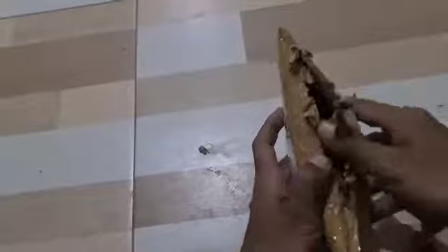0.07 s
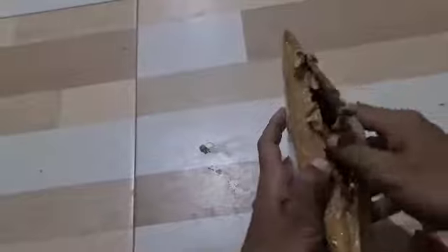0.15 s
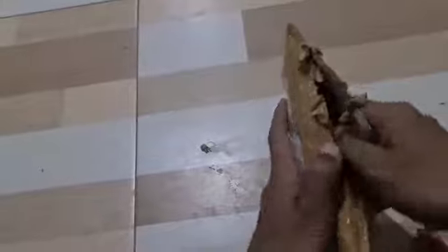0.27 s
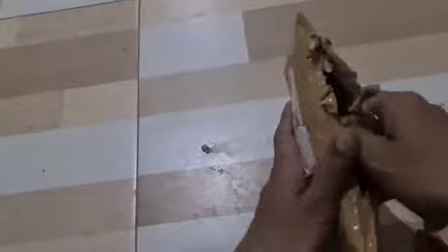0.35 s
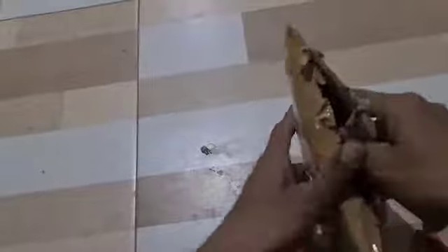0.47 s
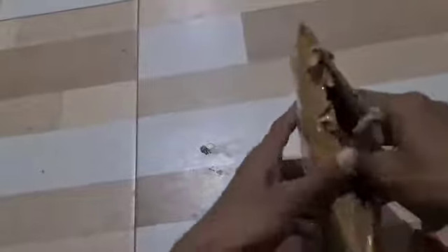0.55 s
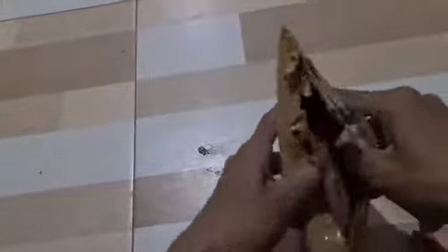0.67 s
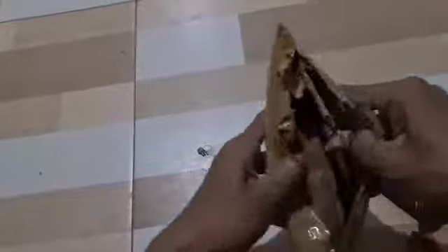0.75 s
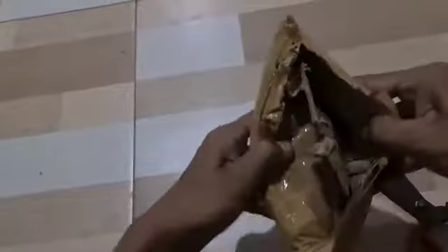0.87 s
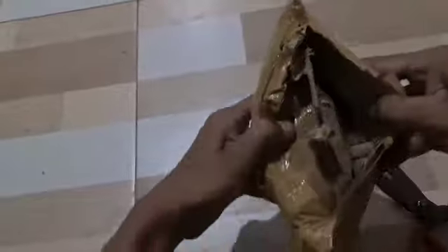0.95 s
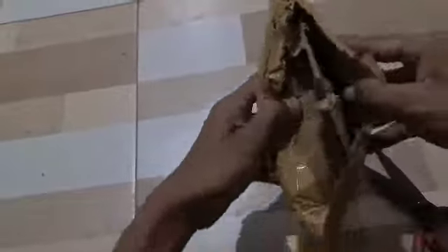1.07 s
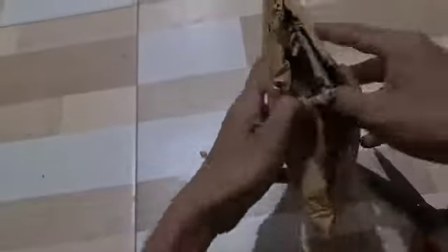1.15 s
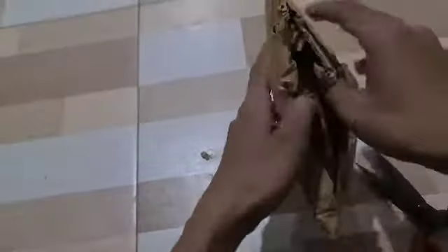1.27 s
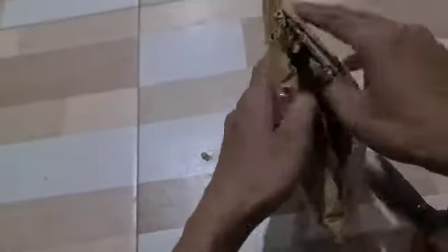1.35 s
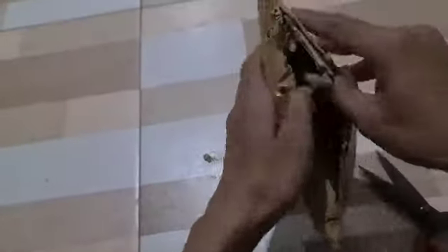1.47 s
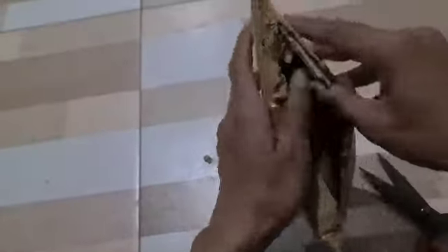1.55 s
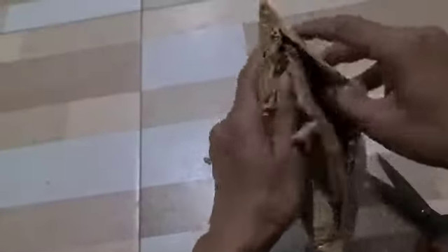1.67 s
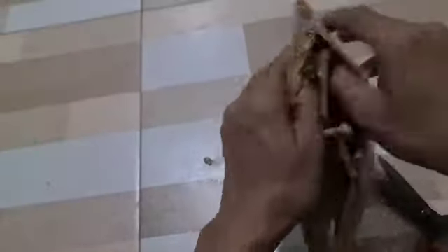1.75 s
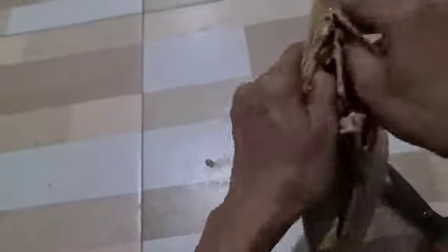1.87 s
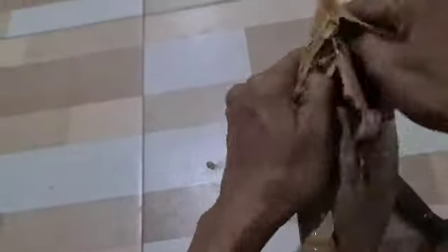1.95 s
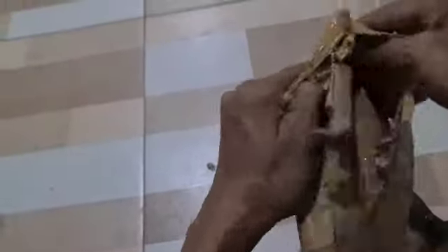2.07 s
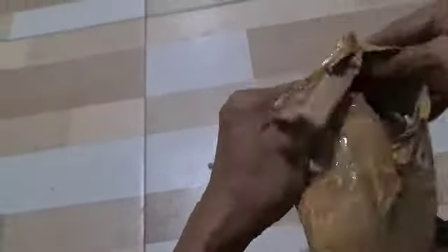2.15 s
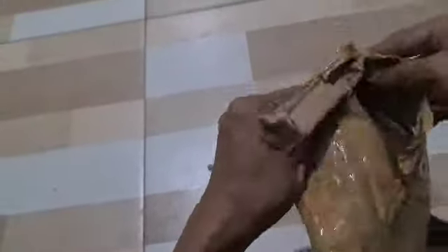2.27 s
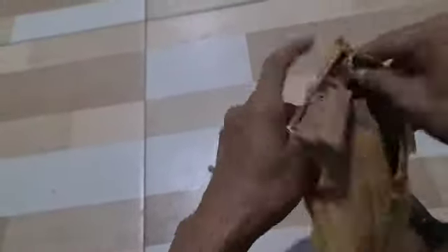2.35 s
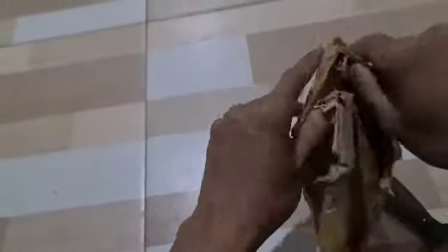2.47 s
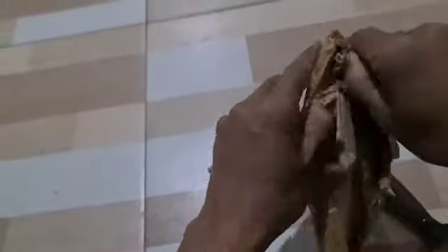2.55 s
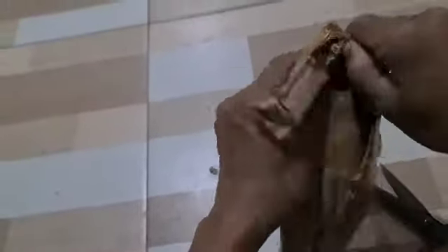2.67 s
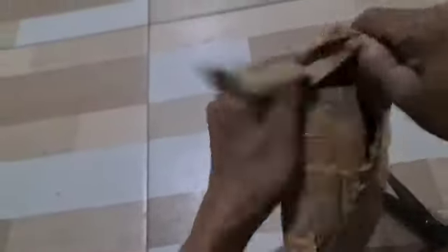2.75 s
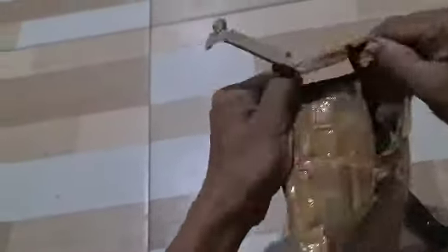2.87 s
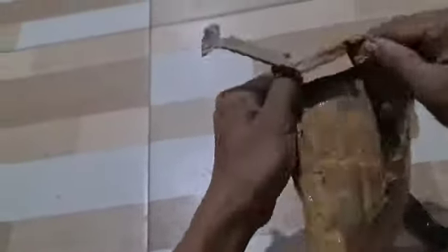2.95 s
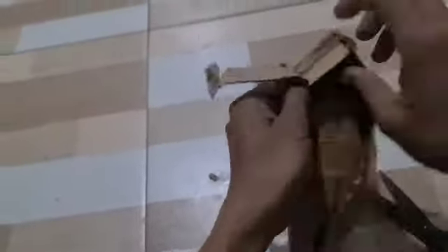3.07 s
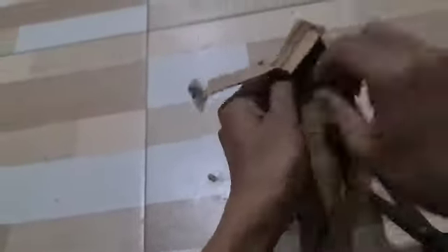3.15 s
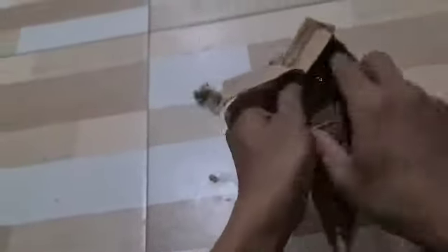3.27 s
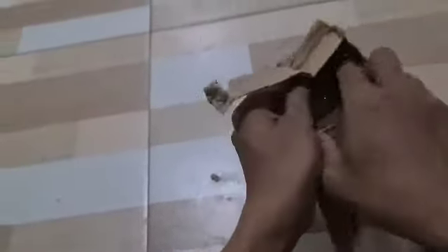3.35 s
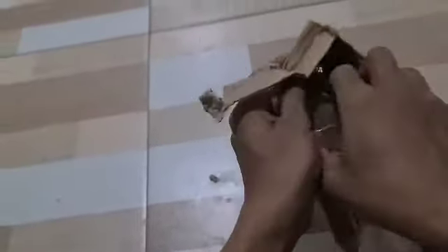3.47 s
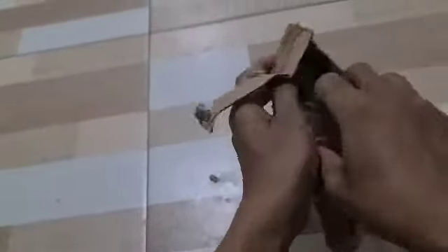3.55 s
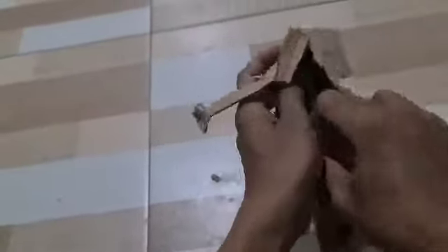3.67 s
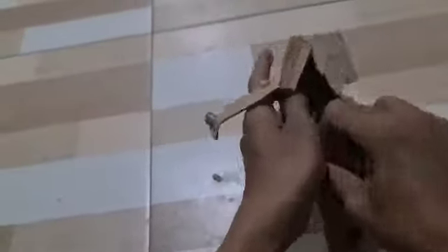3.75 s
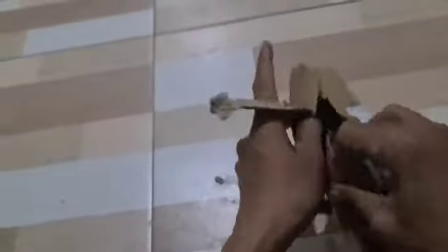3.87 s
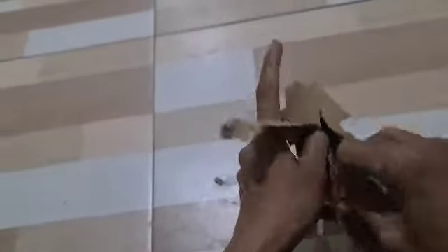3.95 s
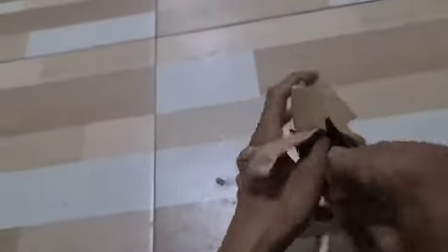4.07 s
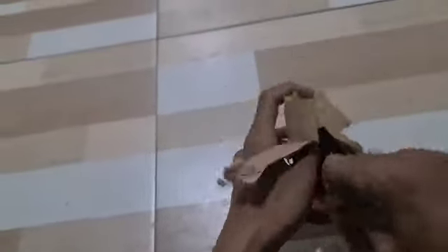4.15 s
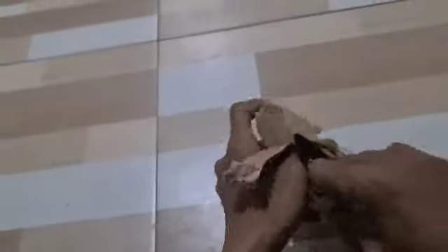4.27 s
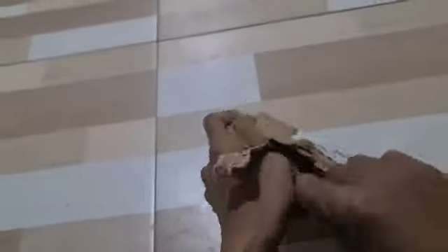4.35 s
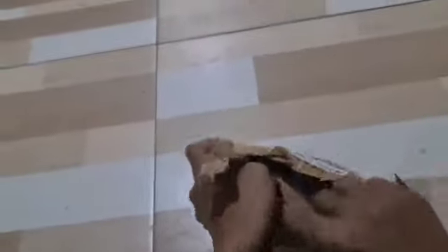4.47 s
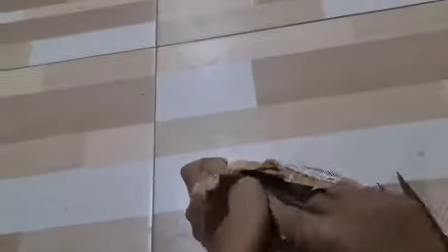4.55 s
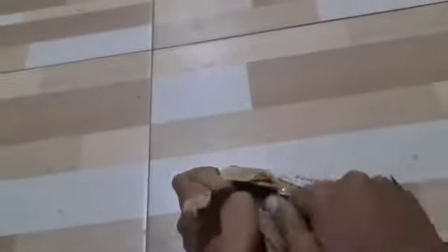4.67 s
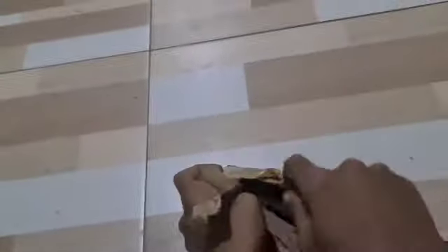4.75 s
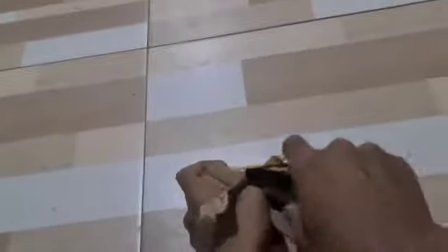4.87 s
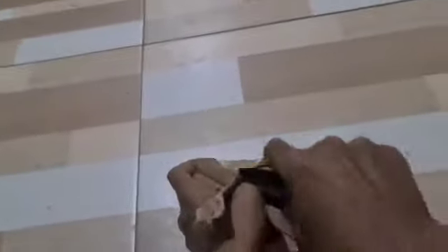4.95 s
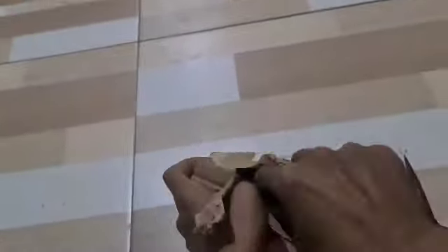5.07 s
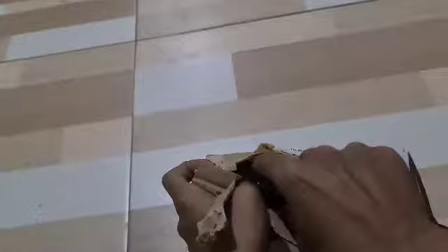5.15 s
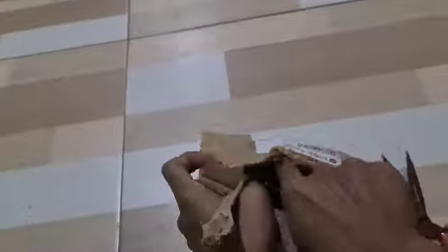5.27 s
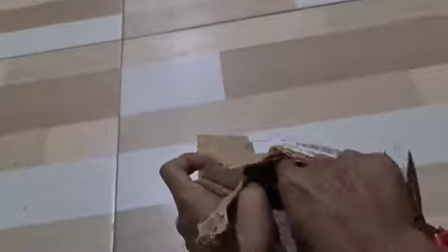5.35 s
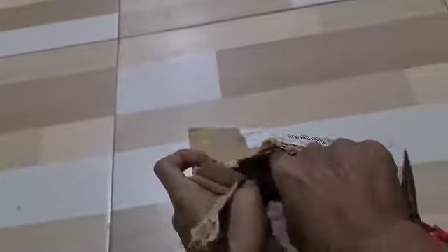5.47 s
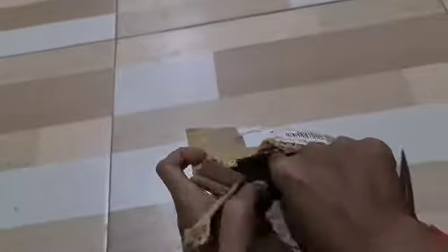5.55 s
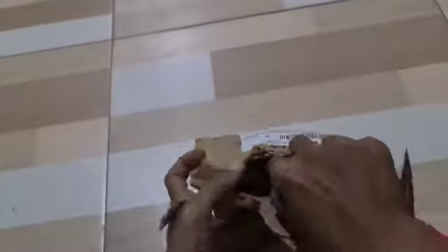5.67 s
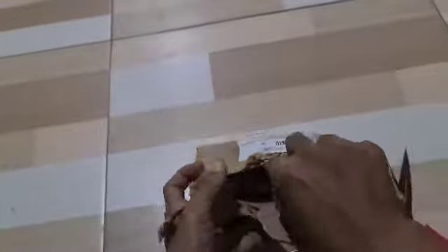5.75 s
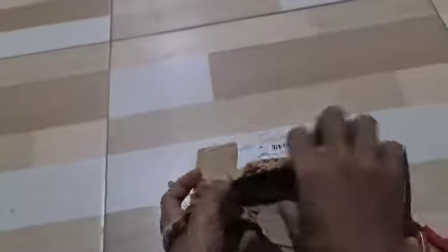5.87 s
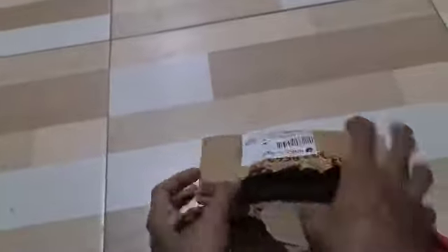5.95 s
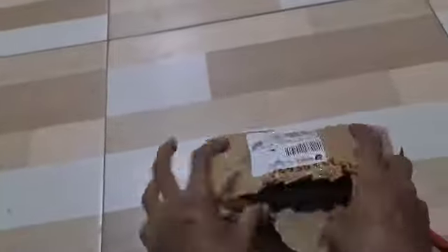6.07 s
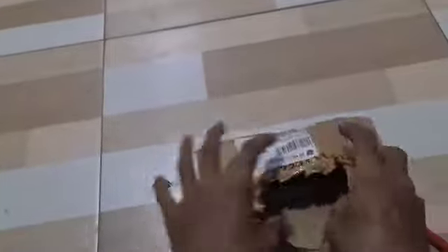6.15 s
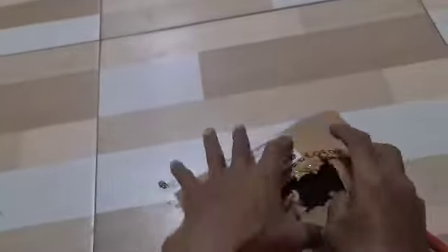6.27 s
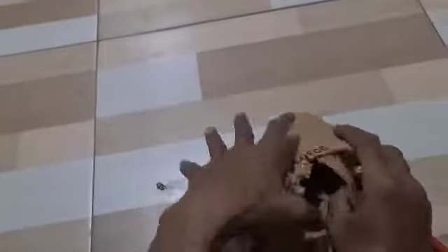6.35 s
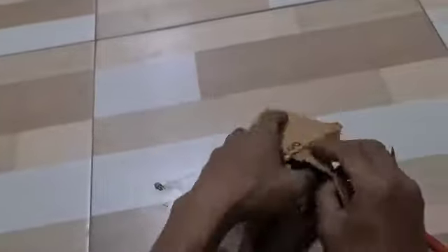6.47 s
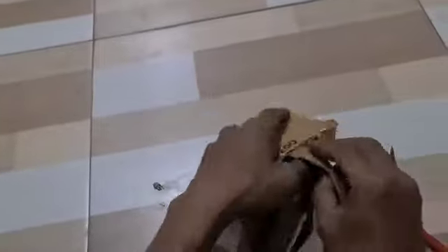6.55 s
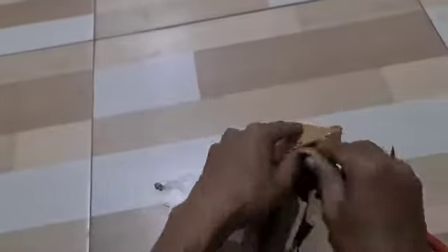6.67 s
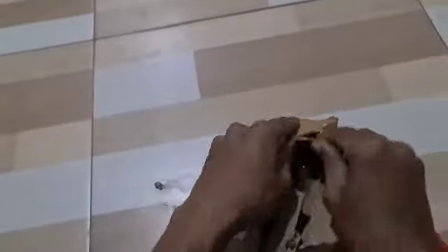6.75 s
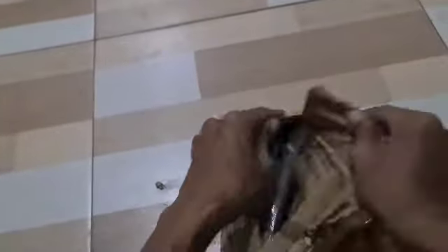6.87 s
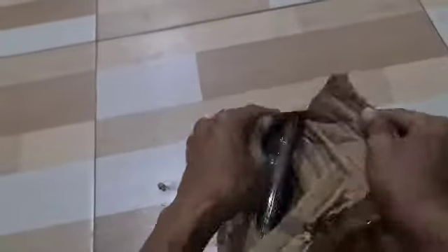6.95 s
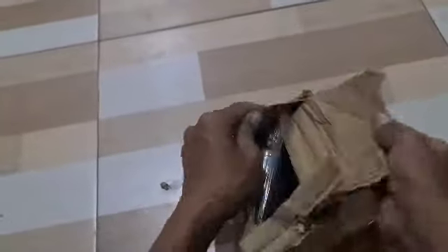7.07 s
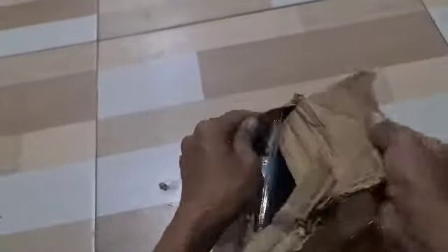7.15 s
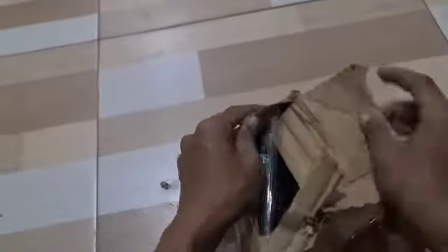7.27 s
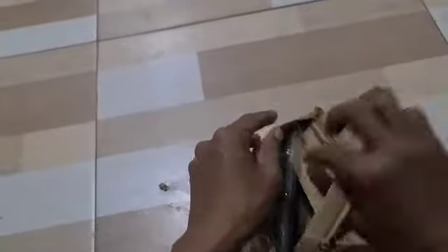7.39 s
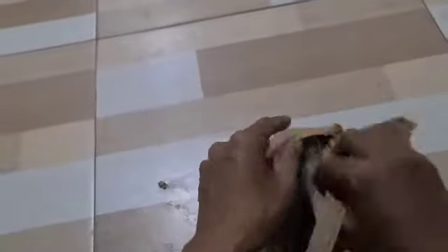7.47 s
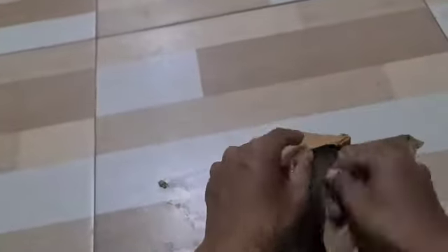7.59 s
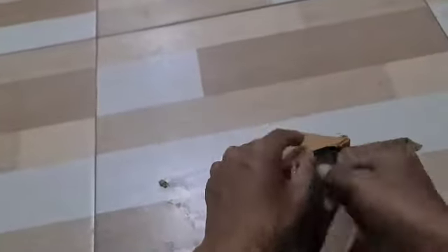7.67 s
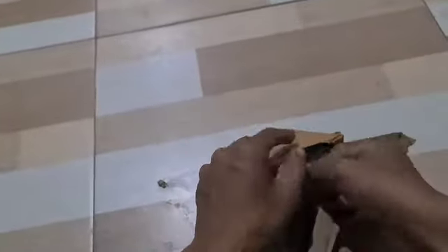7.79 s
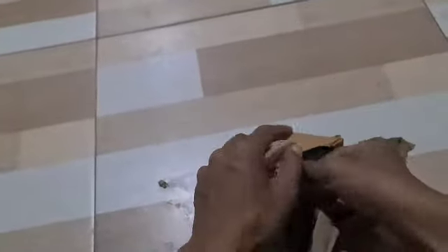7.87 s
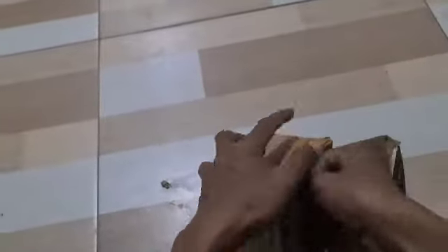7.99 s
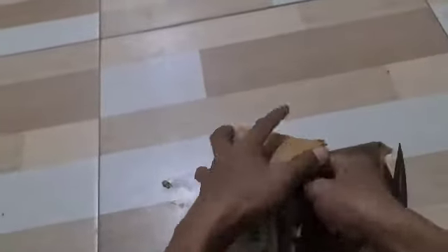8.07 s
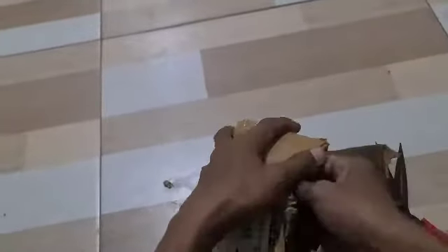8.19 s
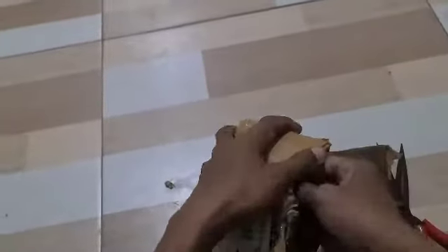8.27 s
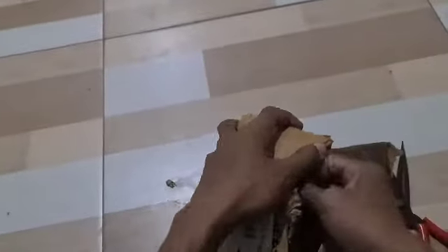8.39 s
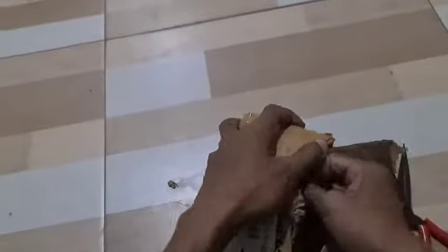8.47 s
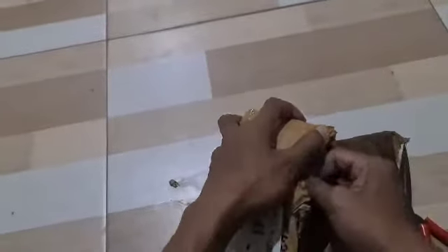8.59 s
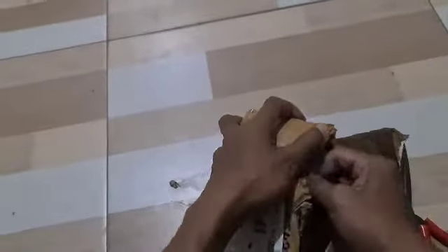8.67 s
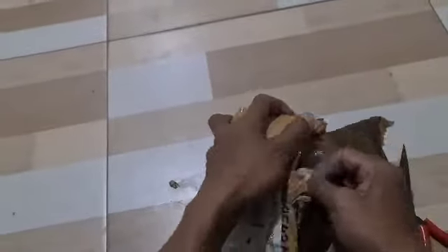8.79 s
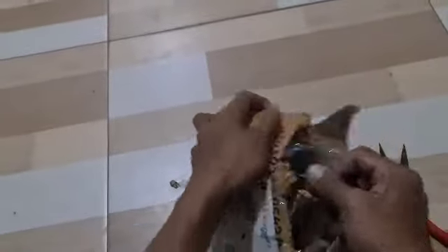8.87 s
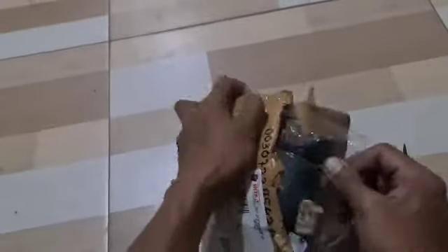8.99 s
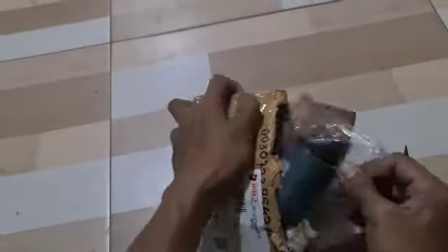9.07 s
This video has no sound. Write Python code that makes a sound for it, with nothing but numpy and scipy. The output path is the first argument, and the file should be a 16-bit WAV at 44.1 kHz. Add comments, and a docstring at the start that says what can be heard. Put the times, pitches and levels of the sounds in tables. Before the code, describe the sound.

Close stereo microphone indoors above a hard floor: hands pull at a taped cardboard parcel. Faint crinkles lead to a hard cluster of snaps and tape cracks, then irregular creasing, rustling and hollow pops. Activity thins into small crinkles with occasional strong pops, flares up around seven seconds, quietens, and ends with another burst. A faint low rumble and soft hiss lie beneath, with a short room tail.

```python
"""Tearing open a taped parcel

Hands tear open a taped cardboard parcel just over a tiled floor, close to a two-port microphone.
Each snap rings the board as dying sines, cracks the tape as filtered noise and thumps the hollow parcel.
Between snaps small creases crinkle at random, their strength following the squeezes of the hands.
The floor throws one echo, the room a short noise-like tail, over a low rumble and faint hiss."""
import sys
import numpy as np
from scipy import signal
from scipy.fft import rfft, irfft
from scipy.io import wavfile
from scipy.ndimage import uniform_filter1d

SR = 44100
rng = np.random.default_rng(int(sys.argv[2]) if len(sys.argv) > 2 else 0)


def waveform_to_disk(signal):
    """Save audio, clipped to [-1, 1], as 16-bit WAV at the path in sys.argv[1]."""
    frames = np.transpose(np.atleast_2d(signal))
    scaled = np.clip(frames, -1, 1) * 32767
    samples = np.round(scaled).astype(np.int16)
    wavfile.write(sys.argv[1], SR, samples)


N = 402173  # length [samples]

# Modes of the cardboard, before the grip detunes them:
# (frequency [Hz], relative level before weighting [dB], decay time t60 [s])
BOARD_MODES = [(738, 1.5, 0.021), (822, 1, 0.029), (1021, 3.5, 0.024), (1275, 8, 0.011), (1432, 9, 0.01),
               (1713, 7, 0.012), (1883, 1, 0.023), (2207, 2.5, 0.021), (2467, 6, 0.016),
               (2875, 11.5, 0.0094), (3470, 0, 0.019), (4094, -1.5, 0.012)]
# Modes of the air in the parcel, before detuning:
# (frequency [Hz], relative level before weighting [dB], decay time t60 [s])
HOLLOW_MODES = [(157.5, -4, 0.022), (291, -12, 0.045), (332, -0.5, 0.041), (393.7, 7, 0.02),
                (571.5, -5, 0.037)]
# Likeness of the diffuse sound at the two ports: (frequency [Hz], left-right correlation [-1 to 1])
PORT_LIKENESS = [(60, 0.84), (180, 0.99), (550, 0.49), (1650, 0.071), (4970, 0.042), (15000, 0.05)]


def gain_of(db):
    """Amplitude ratio of a level: 20 dB is a factor of ten."""
    return 10 ** (np.asarray(db) / 20)


def evened(x):
    """Normalization to unit rms, so that a later gain alone sets the level."""
    return x / np.sqrt(np.mean(x ** 2) + 1e-20)


def read(points, hz):
    """Interpolation of a curve along logarithmic frequency."""
    f, value = np.transpose(points)
    return np.interp(np.log(hz + 1), np.log(f + 1), value)


def correlated(first, second):
    """Partial coherence: mixing two independent spectra gives the ports the tabled likeness."""
    hz = np.linspace(0, SR / 2, len(first))
    same = np.clip(read(PORT_LIKENESS, hz), -1, 1)[:, None]
    return np.array([first, same * first + np.sqrt(1 - same ** 2) * second])


def air():
    """Stationary noise: random short-time spectra under a fixed colour give room rumble and hiss."""
    # Colour of rumble and hiss: (frequency [Hz], relative spectral density [dB per Hz])
    air_colour = [(15, -28), (25, -1), (80, 10.5), (121, 6), (214, -3.5), (378, 2), (651, -10.5),
                  (1220, -6.5), (1830, -10), (2670, -14), (11600, -24), (15200, -18.5), (16500, -54)]
    level_db = -52  # rms over both ports
    frames, hz = N // 512 + 5, np.fft.rfftfreq(2048, 1 / SR)
    a, b, c, d, patches = rng.standard_normal((frames, len(hz), 5)).T
    # faint drifting patches: noise smoothed along frequency, then along time
    patches = uniform_filter1d(patches, 8, axis=0)
    patches = evened(uniform_filter1d(patches, 8, axis=1))
    spectra = correlated(a + 1j * b, c + 1j * d)
    spectra *= gain_of(read(air_colour, hz)[:, None] + 2.2 * patches)
    noise = signal.istft(spectra, nperseg=2048, noverlap=1536)[1][:, :N]
    return gain_of(level_db) * evened(noise)


def room(x):
    """Reflection and reverberation: one floor echo, then a diffuse tail dying band by band."""
    # Reverberation: (frequency [Hz], decay time t60 [s])
    room_decay = [(150, 0.14), (500, 0.33), (1400, 0.39), (3700, 0.48), (9700, 0.35), (16000, 0.061)]
    echo_s, echo_db = 0.0076, -16
    tail_db, build_up_s = -12, 0.015  # tail energy re the direct sound
    hz, t, noise = signal.stft(rng.standard_normal((2, SR * 3 // 4)), SR, nperseg=256)
    decay_db = -60 * t / read(room_decay, hz)[:, None]
    tail = signal.istft(correlated(*noise) * gain_of(decay_db), SR, nperseg=256)[1]
    tail = tail * np.clip(np.arange(tail.shape[1]) / SR / build_up_s, 0, 1)
    tail = gain_of(tail_db) * tail / np.linalg.norm(tail[0])
    tail[:, round(echo_s * SR)] += gain_of(echo_db)
    return signal.fftconvolve(x, tail, axes=1)[:, :N]


def ringing(modes, t, weight, turns, detune=1):
    """Modal synthesis: dying sines, each with its own weight and starting phase in turns."""
    hz, db, t60 = np.transpose(modes)[:, :, None]
    envelope = weight[:, None] * gain_of(db - 60 * t / t60)
    return (envelope * np.sin(2 * np.pi * (hz * detune * t + turns[:, None]))).sum(0)


def near(hz, slope_db):
    """Modal excitation: a blow favours board modes near hz, the rest falling by slope_db per octave."""
    return gain_of(-slope_db * abs(np.log2(np.transpose(BOARD_MODES)[0] / hz)))


def crack(noise, t, t60, tilt_db=0):
    """Broadband impulse: coloured tape noise dies at once; thin film cracks brighter (dB per octave)."""
    # Colour of the crack before tilting: (frequency [Hz], relative spectral density [dB per Hz])
    tape_colour = [(1760, -92), (3000, -7), (5200, -9.5), (6120, -7.5), (6760, -10), (9660, -13.5),
                   (12100, -12), (15400, -12.5), (16500, -80)]
    hz = np.fft.rfftfreq(len(t), 1 / SR)
    octaves = np.log2(np.clip(hz, 4000, None) / 8000)  # the tilt acts above 4 kHz
    colour_db = read(tape_colour, hz) + tilt_db * octaves
    return irfft(rfft(noise) * gain_of(colour_db), len(t)) * gain_of(-60 * t / t60)


def squeezes():
    """Addition of powers: overlapping squeezes sum, and the stronger weigh more in the mean pitch."""
    # Squeezes and pulls, levels at the peak before clumping: (peak time [s], swell [s], fade [s],
    # board crinkle level [dB], board pitch [Hz], tape rustle level [dB], hollow rubbing level [dB])
    squeeze_table = [(.06, 0.042, 0.023, -48, 1412, -50, -62), (.29, 0.056, 0.041, -57, 1468, -56, -58),
                     (0.489, 0.053, 0.042, -59.5, 1380, -67, -61),
                     (.61, 0.065, 0.19, -31.5, 2000, -33.5, -35.5),
                     (0.851, 0.092, .13, -38, 2202, -34.5, -45), (1.06, 0.078, 0.27, -42, 1600, -46, -52.5),
                     (1.119, .04, 0.11, -40, 1400, -46.5, -51), (1.411, 0.05, 0.06, -58, 1540, -57.5, -60),
                     (1.55, 0.042, 0.069, -59, 1460, -51.5, -72),
                     (1.68, 0.047, 0.11, -43.5, 1054, -43.5, -58),
                     (1.761, 0.062, 0.033, -46, 1056, -41, -50),
                     (1.899, 0.06, 0.15, -43.5, 2280, -44.5, -48),
                     (2.11, 0.13, 0.11, -42, 1305, -44.5, -56),
                     (2.21, 0.055, 0.091, -40.5, 1430, -53.5, -45), (2.33, .06, .05, -38, 1543, -38.5, -46),
                     (2.429, 0.06, 0.16, -46, 1454, -44.5, -60), (2.631, 0.11, 0.11, -52, 1730, -47, -54),
                     (2.75, 0.051, 0.066, -39.5, 1153, -42, -48),
                     (2.95, 0.025, .1, -47.5, 1610, -42.5, -50),
                     (3.056, 0.09, 0.032, -42.5, 1457, -43, -50), (3.22, .04, 0.033, -52, 1482, -50.5, -53),
                     (3.39, 0.038, .1, -44, 1401, -53.5, -72), (3.49, 0.092, 0.18, -50, 1404, -49, -55),
                     (3.832, 0.15, 0.18, -45, 1365, -46, -52.5), (3.97, 0.055, 0.17, -56, 1810, -50, -57),
                     (4.291, 0.11, 0.086, -46, 1500, -48, -57), (4.38, .06, 0.15, -38, 1460, -42, -49.5),
                     (4.58, 0.035, 0.23, -46, 1890, -43.5, -55), (4.798, 0.096, 0.093, -41, 1782, -49, -66),
                     (4.938, 0.095, .07, -48.5, 1606, -48, -54), (5.11, 0.086, 0.1, -46.5, 1585, -52, -52),
                     (5.225, 0.064, 0.093, -48.5, 1625, -45.5, -49),
                     (5.4, 0.078, 0.18, -45, 1390, -50.5, -48.5),
                     (5.559, 0.044, 0.097, -44.5, 1395, -44, -49),
                     (5.615, 0.053, 0.22, -43.5, 1458, -52, -45), (5.91, .18, 0.31, -46, 1781, -47, -52.5),
                     (6.11, 0.15, 0.045, -58, 2170, -46, -59), (6.27, .12, 0.13, -46, 1786, -46.5, -57),
                     (6.435, 0.052, 0.049, -49.5, 1745, -49.5, -49),
                     (6.595, 0.095, 0.078, -44, 1618, -46, -44),
                     (6.68, 0.06, 0.073, -47.5, 1460, -59, -47.5),
                     (6.851, 0.085, 0.092, -36, 1404, -30.5, -35.5),
                     (7.034, 0.063, 0.11, -39, 1863, -33, -37.5),
                     (7.18, 0.092, 0.27, -45.5, 2140, -46, -51),
                     (7.57, 0.36, 0.068, -49.5, 1807, -48.5, -50),
                     (7.655, 0.076, 0.096, -44, 1485, -46, -44),
                     (7.91, 0.16, 0.091, -51.5, 1512, -51.5, -47.5),
                     (8.01, 0.052, 0.089, -44, 1476, -47.5, -50),
                     (8.085, 0.081, 0.12, -51, 1360, -48, -48.5),
                     (8.5, 0.08, 0.15, -51, 1590, -57.5, -49.5),
                     (8.74, 0.059, 0.084, -43, 1972, -47.5, -50),
                     (8.881, 0.063, 0.099, -29, 1787, -30.5, -33), (9.11, .15, .1, -37, 2163, -34.5, -41.5)]
    drop_db, rounding = 13, 1.3  # fall after one swell or fade time; power of that curve
    tilt_base_db, tilt_per_db = -0.54, 0.35  # dB per octave; more where tape stands over board
    t = np.arange(0, N + 256, 128) / SR
    peak, swell, fade, board_db, hz, tape_db, hollow_db = np.transpose(squeeze_table)[:, :, None]
    distance = np.where(t < peak, (peak - t) / abs(swell), (t - peak) / abs(fade))
    shape_db = -drop_db * distance ** rounding
    board, tape, hollow = (gain_of(np.maximum(db + shape_db, -110)) ** 2
                           for db in (board_db, tape_db, hollow_db))
    hz = (board * hz).sum(0) / board.sum(0)
    board_db, tape_db, hollow_db = (10 * np.log10(power.sum(0)) for power in (board, tape, hollow))
    tilt_db = tilt_base_db + tilt_per_db * (tape_db - board_db)
    curves = (board_db, hz, tape_db, tilt_db, hollow_db)
    return (np.interp(np.arange(N) / SR, t, curve) for curve in curves)


def clumps():
    """Correlated fluctuation: low-passed noise as a gain makes creases give way in clumps."""
    depth_db, length_s = 2, 0.02  # rms depth; correlation time
    steps = rng.standard_normal(N // 128 + 2)
    steps = signal.lfilter([1], [1, -np.exp(-128 / SR / length_s)], steps)
    steps = evened(steps)
    return gain_of(depth_db * np.interp(np.arange(N) / 128, np.arange(len(steps)), steps))


def scattered(shapes, kind, at, size):
    """Superposition: sums one scaled shape at each place."""
    places = at[:, None] + np.arange(shapes.shape[1])
    return np.bincount(places.ravel(), (size[:, None] * shapes[kind]).ravel(), N)[:N]


def creases(shapes, per_s, spread_db, reach, aim, stray):
    """Shot noise: random creases, a few large, each with its own delay and balance at the two ports.

    The curve aim (0-1 along the shapes) says where the choice of shape falls, within half of stray;
    reach is the range of the delays in samples."""
    count = round(per_s * N / SR)
    at, kind, place, side, size = rng.random((count, 5)).T
    size = gain_of(-spread_db * np.log(np.maximum(size, .002)))
    at = (at * (N - 40)).astype(int) + 20
    kind = (aim[at] + stray * (kind - .5)) * len(shapes)
    kind = np.clip(kind, 0, len(shapes) - 1).astype(int)
    at_left = at + np.round(reach * (place - .4)).astype(int)
    left = scattered(shapes, kind, at_left, size * np.sqrt(side))  # side shares the power
    right = scattered(shapes, kind, at, size * np.sqrt(1 - side))
    return evened(np.array([left, right]))


def crinkle():
    """Crackling noise: many small releases of board, tape and hollow under the hands."""
    board_db, hz, tape_db, tilt_db, hollow_db = squeezes()
    t, draws = np.arange(1024) / SR, rng.random((40, 3, len(BOARD_MODES)))
    pitches = np.geomspace(900, 3200, 40)  # Hz
    tilts = np.linspace(-10, 8, 40)  # dB per octave
    along = np.linspace(0, 1, 40)
    board, hollow = [], []
    for f, (a, b, c) in zip(pitches, draws):
        plate = ringing(BOARD_MODES, t, near(f, 11.) * gain_of(8 * a), b, .93 + .14 * c[6])
        fold = ringing([(f, 12., 7.3 / f)], t, a[:1] + 1, b[:1])  # t60 of 7.3 cycles
        board.append(plate + fold)
        rub = ringing(HOLLOW_MODES, t, gain_of(21.4 * a[:5]), 0.18 * c[:5], 0.967 + 0.11 * c[6])
        hollow.append(rub * (1 - np.exp(-t / 0.00097)))
    tape = [crack(noise, t[:len(noise)], .007, tilt)
            for noise, tilt in zip(rng.standard_normal((40, 320)), tilts)]
    board = board * (1 - np.exp(-(t / 0.0013) ** 2))  # creases give way softly
    board, hollow, tape = (np.array([evened(x) for x in shapes]) for shapes in (board, hollow, tape))
    clump = clumps()
    board_aim, tape_aim = np.interp(hz, pitches, along), np.interp(tilt_db, tilts, along)
    board = gain_of(board_db) * creases(board[:, :768], 800, 1.37, 24, board_aim, .3)
    tape = gain_of(tape_db) * creases(tape, 1500, 3., 24, tape_aim, .3)
    hollow = gain_of(hollow_db) * creases(hollow, 150, 2.8, 24, np.full(N, .5), 1)
    return clump * (board + tape) + hollow


def add(mix, s, sound, pan_db, lag):
    """Interaural cues: level and time differences place a sound; the left port lags by lag samples."""
    right_at = round(s * SR)
    left_at = max(right_at + lag, 0)
    for port, db, at in zip(mix, (pan_db / 2, -pan_db / 2), (left_at, right_at)):
        part = port[at:][:len(sound)]
        part += gain_of(db) * sound[:len(part)]


def snaps():
    """Impulsive excitation: a snap rings two free flaps and the board, cracks tape and thumps the hollow."""
    # Snaps, levels as early rms before panning: (time [s], board ring level [dB], first flap [Hz],
    # second flap [Hz], second flap re first [dB], tape crack level [dB], hollow thump level [dB])
    snap_table = [(0.151, -48, 3790, 3240, 0, -44.5, -66), (0.217, -66, 1190, 1720, -9, -72, -49),
                  (0.459, -49, 1190, 1720, -7, -77, -55), (0.5398, -31.5, 2160, 980, -7, -28.5, -58),
                  (0.5562, -19, 1270, 2100, -9, -18.5, -34), (0.599, -18, 1630, 3640, 14.5, -24, -28),
                  (0.6995, -27.5, 1770, 1250, -3, -41, -59), (0.7861, -35, 1150, 2110, -3, -41, -66),
                  (0.8329, -24, 1115, 1680, -5, -15.5, -32.5), (0.991, -39.5, 960, 2120, -10, -54, -54),
                  (1.0613, -20.5, 1140, 1800, 2, -33, -28), (1.0676, -12, 1213, 1780, 0, -18, -49),
                  (1.1913, -33.5, 1090, 1640, 2, -53, -51), (1.365, -51, 1090, 1650, 6, -58, -43.5),
                  (1.431, -45.5, 1680, 1040, 1, -50, -60), (1.6429, -42.5, 1970, 940, -10, -44, -54),
                  (1.6721, -38.5, 890, 1720, -7, -43, -67), (1.6933, -37.5, 1090, 1840, -3, -42, -56),
                  (1.8338, -49, 3200, 1730, -3, -45, -69), (1.8574, -54, 3750, 3200, -2, -41, -68),
                  (1.8641, -30.5, 3120, 3800, 14, -37, -66), (1.9179, -44, 1700, 3830, 0, -33, -48),
                  (1.9386, -45, 4000, 1510, -5, -37, -74), (1.9862, -34, 1440, 2300, -2, -30.5, -65),
                  (2.004, -47, 1320, 2060, -1, -39, -67), (2.0178, -50, 1540, 900, -2, -41, -67),
                  (2.0904, -33, 1260, 1670, -11, -54, -57), (2.1009, -20.5, 1270, 3100, 16, -46, -42),
                  (2.1038, -13, 1206, 2110, 0, -20, -29), (2.107, -13.5, 1060, 1500, -1, -36, -38),
                  (2.128, -43, 1540, 970, 1, -32, -53), (2.162, -33, 1010, 2300, -9, -29, -59),
                  (2.1866, -20.5, 1665, 1200, -4, -23, -29), (2.26, -42.5, 1680, 2540, -8, -35.5, -62),
                  (2.3042, -38, 1080, 1750, -1, -40, -51), (2.325, -36, 1500, 1060, -7, -39, -50),
                  (2.3423, -50, 1500, 3760, -2, -37, -56), (2.399, -38, 1860, 2430, -13, -50, -68),
                  (2.4143, -60, 1710, 850, 1, -37, -44), (2.4265, -41, 960, 1770, -5, -53, -48),
                  (2.5304, -39, 1620, 3360, -9, -46, -58), (2.601, -51, 3800, 1060, 1, -37.5, -67),
                  (2.686, -51, 1540, 2310, 3, -38, -72), (2.7348, -43, 970, 1540, -8, -29.5, -59),
                  (2.7452, -37.5, 1030, 1660, -5, -37, -48), (2.9425, -32.5, 1720, 1170, -9, -53, -64),
                  (2.9596, -33.5, 990, 1600, -2, -47, -47), (3.036, -43, 810, 1960, -12, -41, -43),
                  (3.3935, -36.5, 960, 1840, 6, -41, -52), (3.4037, -47, 1660, 2350, -1, -34.5, -50),
                  (3.4534, -39.5, 1190, 1860, 0, -71, -49.5), (3.721, -40, 1370, 2280, -12, -46, -49),
                  (3.8176, -28.5, 1007, 1600, 0, -38, -37), (3.8857, -39.5, 1500, 2380, -13, -39, -69),
                  (4.1222, -39.5, 1320, 2780, -4, -46, -51), (4.3075, -48, 1510, 980, 0, -40.5, -71),
                  (4.3663, -17, 1500, 1030, -15, -47, -34.5), (4.3856, -25, 1350, 2140, -16, -60, -40),
                  (4.582, -45, 3280, 2080, -11, -34, -64), (4.7036, -45.5, 1230, 1860, -4, -59, -39.5),
                  (4.7722, -15, 1442, 2270, 2.5, -27, -34.5), (5.3289, -39, 1100, 2210, -18, -70, -45),
                  (5.3411, -28.5, 1400, 1920, -7, -45, -35.5), (5.39, -38, 1000, 1970, -15, -60, -40.5),
                  (5.482, -25, 1385, 2700, -34, -68, -39), (5.5992, -21.5, 1460, 990, -31, -35.5, -24),
                  (5.6828, -38.5, 1780, 1190, -12, -59, -49), (5.7924, -36, 1560, 2090, -8, -66, -48),
                  (5.9, -48, 2210, 1450, 2, -40, -69), (5.917, -50, 1730, 2510, -9, -41, -66),
                  (5.95, -48, 1700, 2260, 2, -37.5, -63), (6.0486, -43, 2520, 1010, -13, -37.5, -53),
                  (6.0608, -41, 2620, 3650, -9, -52, -60), (6.098, -51, 2670, 3960, -4, -33, -63),
                  (6.421, -44, 1210, 2330, -8, -53, -41), (6.4277, -39.5, 1810, 2310, -12, -46, -35.5),
                  (6.547, -51, 1200, 1910, -5, -60, -38.5), (6.5692, -23, 1400, 1920, 1, -34, -32),
                  (6.613, -31, 1220, 2070, 2, -39, -31), (6.7397, -26.5, 1930, 1260, -6.5, -56, -64),
                  (6.7588, -30, 1830, 1233, -12, -64, -63), (6.837, -14.5, 1980, 1103, -6.5, -25, -48),
                  (7.0156, -30, 2360, 1650, -3, -38, -38), (7.02, -21, 2546, 1780, -10, -35, -56),
                  (7.025, -29.5, 1940, 2400, -2, -17, -35.5), (7.362, -50, 1100, 1550, -1, -55, -48),
                  (7.403, -48, 845, 1550, -6, -61, -48), (7.536, -55, 1100, 1550, -5, -56, -44),
                  (7.5846, -44, 2290, 1550, -11, -33, -69), (7.6324, -35, 1420, 1840, -14, -33, -37.5),
                  (7.6549, -39, 1430, 2830, -9, -46, -49), (8.0562, -40, 2180, 2940, -13, -48, -52),
                  (8.2659, -72, 1100, 3530, -5, -44, -59), (8.572, -39, 1980, 1260, -5, -41, -63),
                  (8.849, -48, 3500, 1030, -2, -49, -42), (8.87, -18, 1280, 1960, 5, -29.5, -20.5),
                  (8.882, -21.5, 1760, 1140, 0, -45, -27), (8.8877, -18, 1660, 3620, -18, -60, -20),
                  (8.8924, -26, 1870, 1260, -1, -43, -31), (8.966, -33.5, 1600, 1150, 0.5, -45, -56)]
    pan_mean_db, pan_range_db = 1.5, 9  # left over right; full width of the scatter
    tilt_base_db, tilt_per_db = 1.5, 0.17  # dB per octave; more where crack stands over ring
    t, out = np.arange(1536) / SR, np.zeros((2, N))
    chance = rng.random((len(snap_table), 40))
    noises = rng.standard_normal((len(snap_table), len(t)))
    for snap, c, noise in zip(snap_table, chance, noises):
        s, ring_db, hz, second_hz, second_db, crack_db, thump_db = snap
        bend = 1 + 0.082 * (c[35] - .5)  # the grip bends the board and shifts its modes
        flaps = [(f, 9 + db, 19. / f) for f, db in ((hz, 0), (second_hz, second_db))]  # t60 of 19 cycles
        ring = ringing(flaps, t, np.ones(2), 0.18 * c[36:38])
        # a sharp snap shakes the whole board, a soft pop only the flaps
        reach_db = np.clip(.45 * (crack_db - ring_db) + 2, -16, 0)
        weight = near(np.sqrt(hz * second_hz), 5.7) * gain_of(reach_db + 3.4 * (c[:12] - 1.5))
        ring += ringing(BOARD_MODES, t, weight, 0.56 * c[12:24], bend)
        thump = ringing(HOLLOW_MODES, t, gain_of(12.0 * (c[24:29] - .5)), 0.43 * c[29:34], bend)
        tilt_db = np.clip(tilt_base_db + tilt_per_db * (crack_db - ring_db), -12, 10)
        tear = crack(noise, t, .0065, tilt_db)
        sound = 0
        # level [dB], signal, rise [s], head over which the rms is taken [samples]
        for db, x, rise, head in ((ring_db, ring, .0016, 265), (crack_db, tear, .0012, 265),
                                  (thump_db, thump, .0015, 440)):
            x = x * (1 - np.exp(-(t / rise) ** 2))
            sound = sound + gain_of(db) * x / np.std(x[:head])
        pan_db = pan_mean_db + pan_range_db * (c[38] - .5)
        add(out, s, sound, pan_db, lag=int(6 * c[34]) - 1)
    return out


def scene():
    """Superposition: direct sound of the parcel, its reflections and the background add."""
    parcel = snaps() + crinkle()
    return parcel + room(parcel) + air()


def record(dry):
    """Transducer limits: a bass cut, slightly unequal ports, soft overload, then a band limit."""
    bass_cut = signal.butter(3, 44, "highpass", fs=SR, output="sos")
    ports = signal.sosfilt(bass_cut, dry) * gain_of([[-.3], [.3]])  # left, right [dB]
    ports = ports / (1 + abs(ports / .86) ** 4) ** .25  # peaks approach 0.86
    band_limit = signal.firwin(511, 15600, window=("kaiser", 9), fs=SR)
    return signal.oaconvolve(ports, band_limit[None], "same")


dry = scene()
out = record(dry)
waveform_to_disk(out)
```